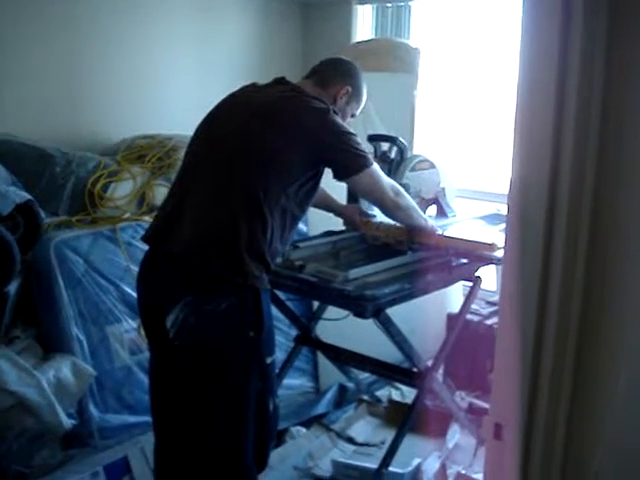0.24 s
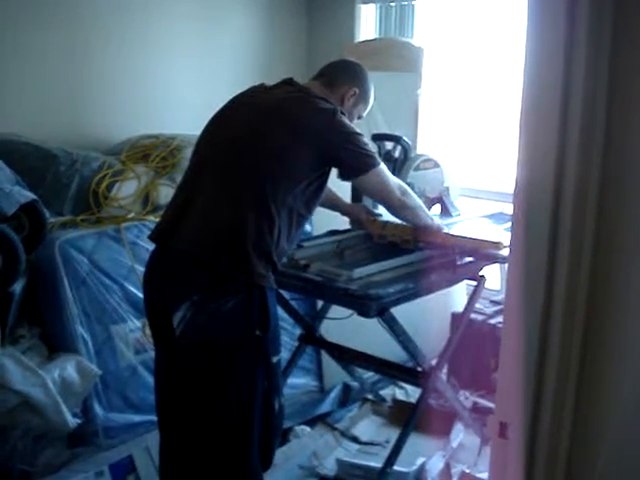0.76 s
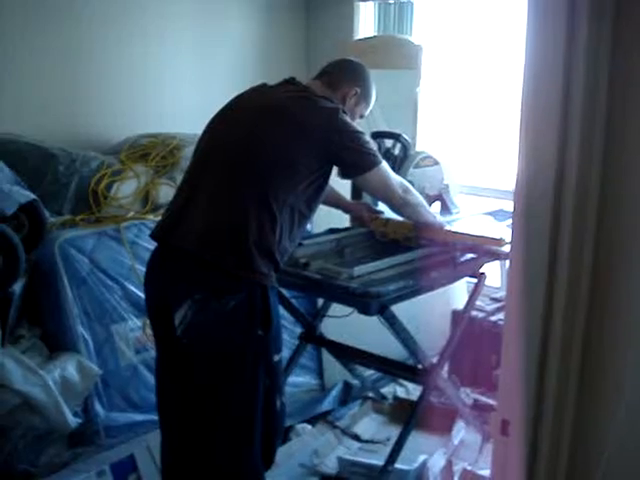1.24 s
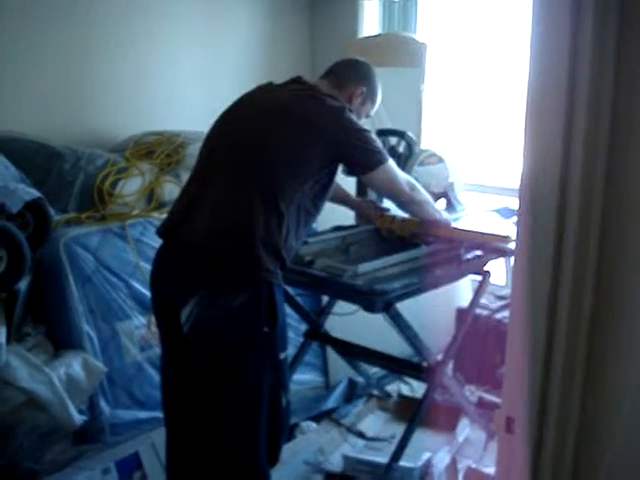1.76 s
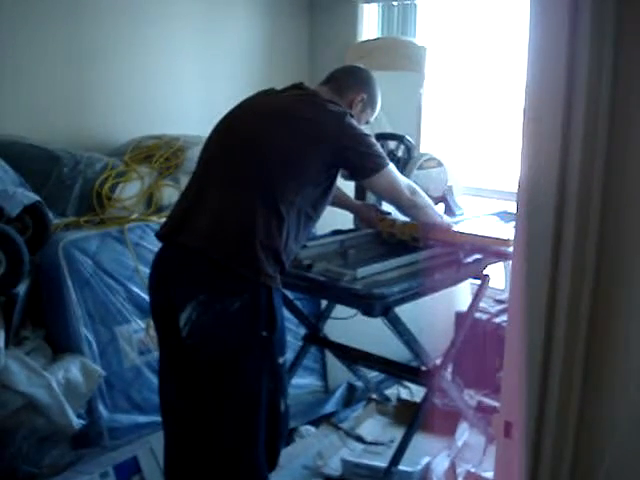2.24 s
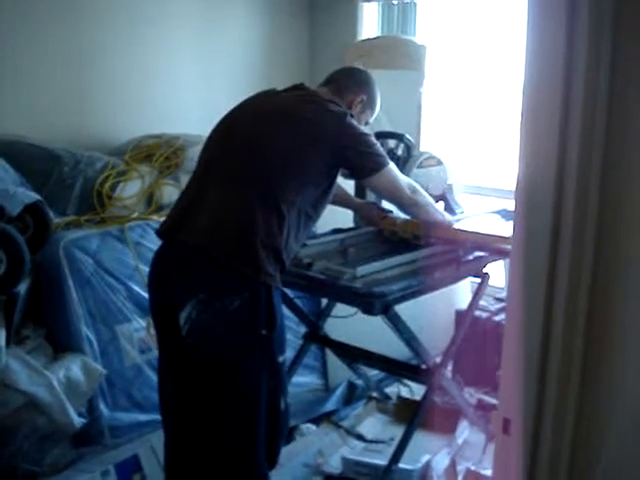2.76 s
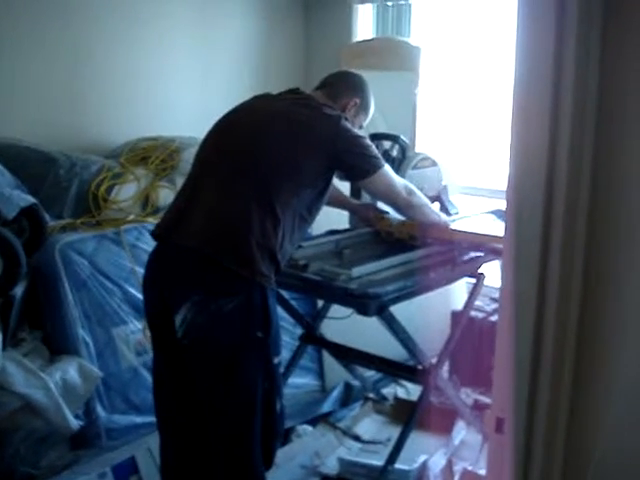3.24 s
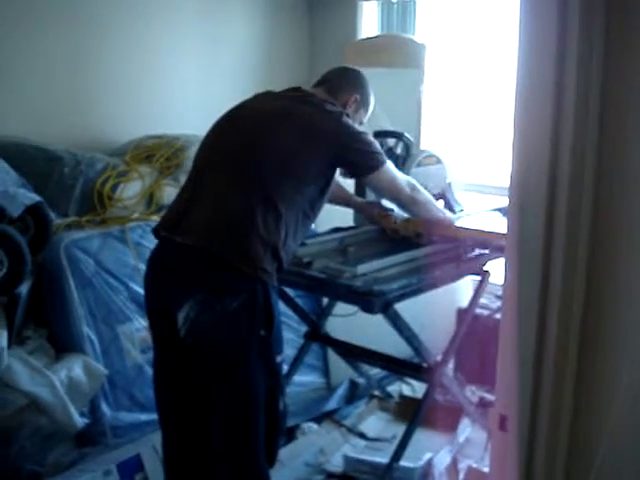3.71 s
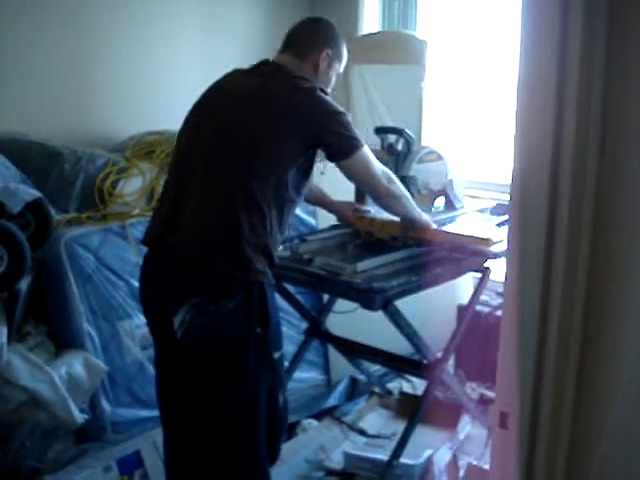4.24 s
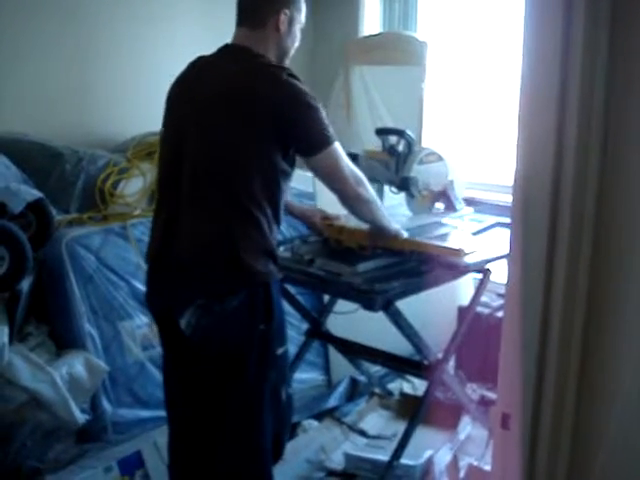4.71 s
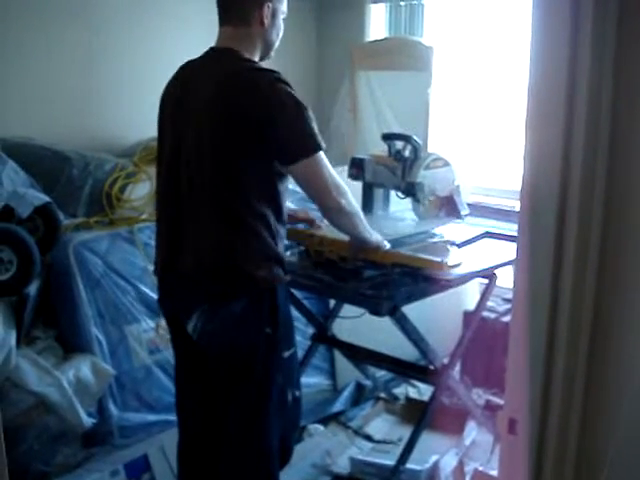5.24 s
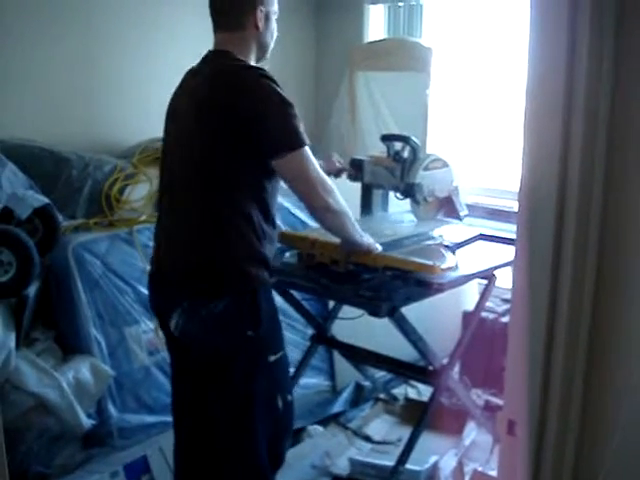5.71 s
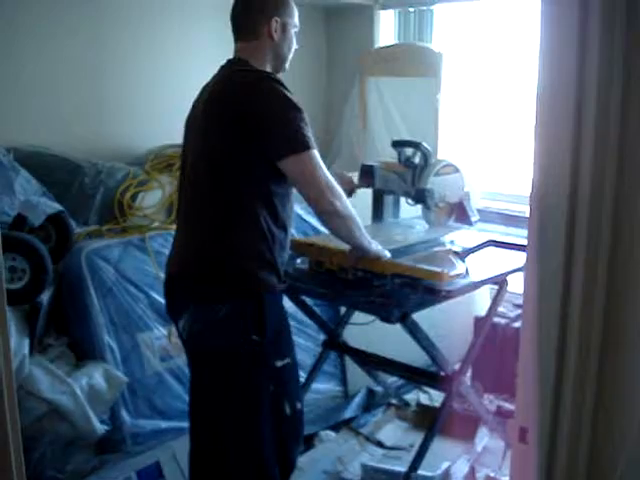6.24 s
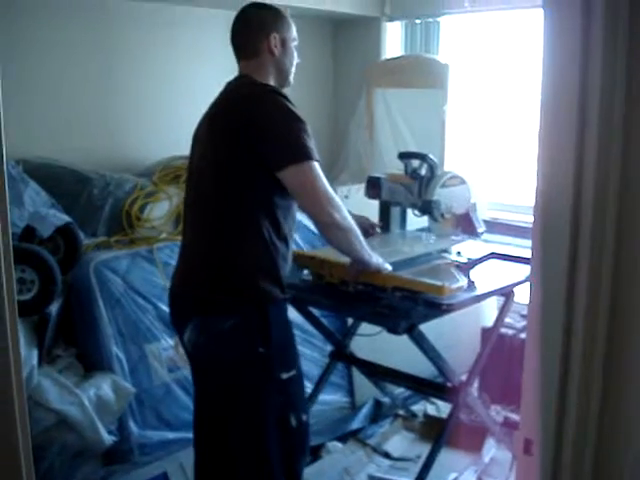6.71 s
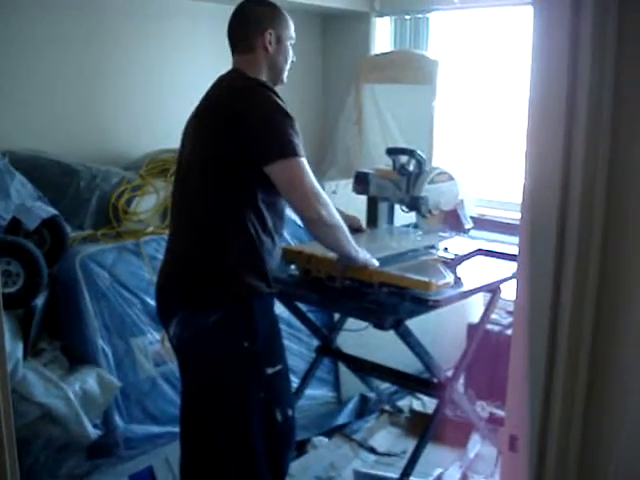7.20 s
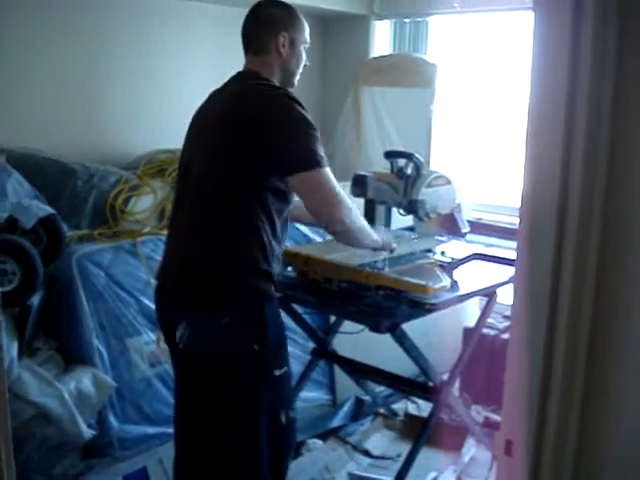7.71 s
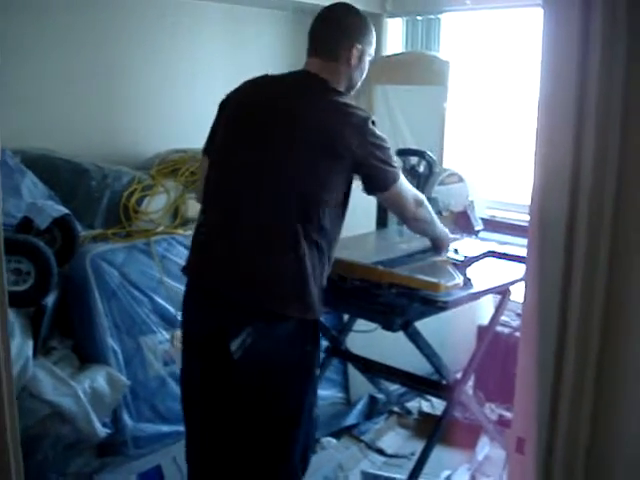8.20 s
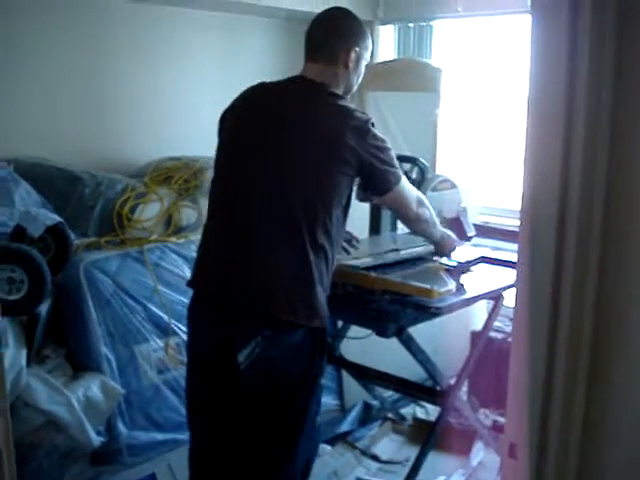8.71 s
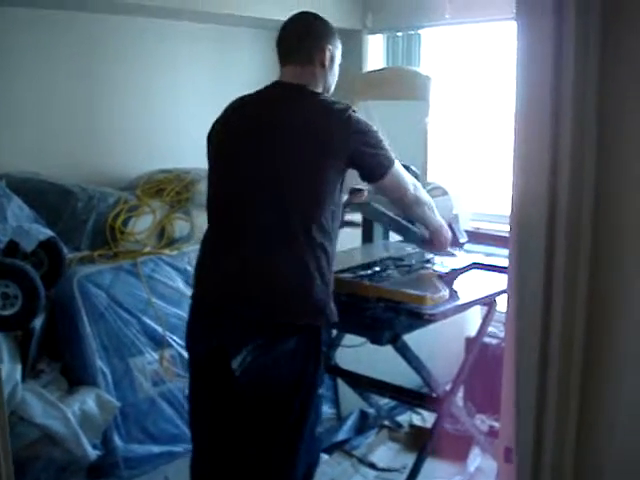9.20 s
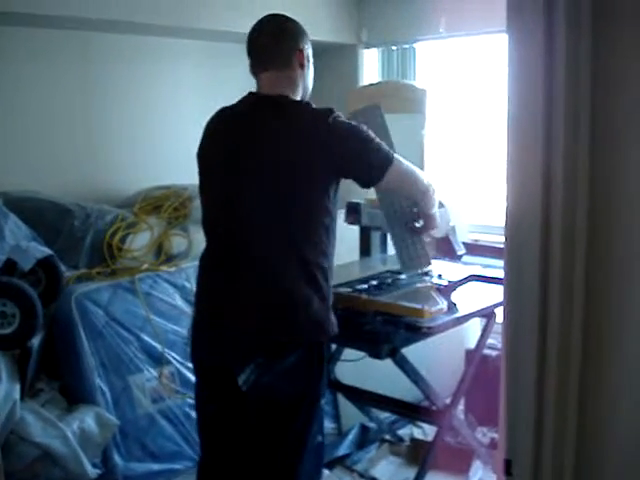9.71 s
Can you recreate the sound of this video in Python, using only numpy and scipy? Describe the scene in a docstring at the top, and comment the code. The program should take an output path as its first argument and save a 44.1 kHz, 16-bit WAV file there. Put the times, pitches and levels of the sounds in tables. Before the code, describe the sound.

A wet saw grinds through tile for about three seconds, buzzing under bright spitting hiss, with ringing from blade and tile. It then runs free with an airy fan roar and gritty rubbing before power is cut and the whine falls. A tile scrapes, water trickles, and a hard clustered knock comes near the end over faint low rumble. Mono pickup in a small, lightly reverberant room.

```python
"""A wet tile saw in a small room, at one microphone: it finishes a cut, runs free, is switched off and coasts.
In the cut the blade buzzes at its turning rate under a hiss of grinding grit, made of shaped noise.
The fan's roar and whine follow the motor's speed; bands of noise ring from blade and tile, and water trickles.
The tile is drawn back along the wet blade, then lifted off the table with a knock.
Behind it all lie the rumble of the stand, a draught at the microphone and soft low bumps."""
import sys
import numpy as np
from scipy import signal
from scipy.fft import rfft, irfft, next_fast_len
from scipy.io import wavfile
from scipy.ndimage import uniform_filter1d

SR = 44100
rng = np.random.default_rng(int(sys.argv[2]) if len(sys.argv) > 2 else 0)


def generate_wav(signal):
    """Clip the signal to [-1, 1] and save it as 16-bit WAV at the path in sys.argv[1]."""
    frames = np.transpose(np.atleast_2d(signal))
    scaled = np.clip(frames, -1, 1) * 32767
    pcm = np.round(scaled).astype(np.int16)
    wavfile.write(sys.argv[1], SR, pcm)


N = 438793
TIME = np.arange(N) / SR
EDGE_HZ = 10080  # upper edge of the microphone's band

# the motor labours under the tile and recovers: (time [s], motor speed [turns/s])
MOTOR_SPEED = [(0, 307.5), (.45, 305.4), (1, 310.4), (1.55, 314), (1.95, 311.8), (2.4, 311.5), (2.9, 313.8),
               (3.15, 318.2), (3.45, 320.6), (4.1, 313), (4.65, 310.6), (5.5, 317.9), (6.05, 321)]
# after the last point the power is off: friction and drag slow the rotor
OFF_S, FULL_SPEED_HZ = MOTOR_SPEED[-1]
FRICTION_HZ_PER_S, DRAG_PER_S = 21.3, .155


def speed_at(t):
    """Motor turns a second: driven at first, then coasting against steady friction and speed-dependent drag."""
    coasted = np.maximum(t - OFF_S, 0)
    offset = FRICTION_HZ_PER_S / DRAG_PER_S
    driven = follow(MOTOR_SPEED, t)[0]
    return (driven + offset) * np.exp(-DRAG_PER_S * coasted) - offset


def halvings_at(t):
    """How many times the speed has halved from full speed."""
    return np.log2(FULL_SPEED_HZ / speed_at(t))


# the blade breaks through the tile, and its buzz dies away
CUT_END_S, RELEASE_DB_PER_S = 3.32, 160


def bite_db(t):
    """Full while the blade is in the tile, falling fast when it breaks through."""
    return -RELEASE_DB_PER_S * np.clip(t - CUT_END_S, 0, 1)


GEAR = 6.1  # motor turns for one turn of the blade
# level of a harmonic of the blade's buzz, before its resonances: (frequency [Hz], level [dB])
BUZZ_SPECTRUM = [(300, -65.5), (405, -51), (600, -52), (720, -54.5), (950, -53.5), (1330, -57), (1700, -54),
                 (2150, -48.5), (3050, -52)]
# resonances of tile and blade that lift the buzz: (frequency [Hz], width [Hz], gain [dB])
BUZZ_RESONANCES = [(458, 5.6, 3), (496, 3.1, 8.5), (552.7, 5.2, 14), (606, 16, 9.5), (887, 17.5, 11.5),
                   (1022, 5, 13), (1109, 11, 14), (1222, 27, 10), (1390, 8, 8), (1562, 17, 11),
                   (1662, 12, 4.5), (1770, 6.2, 14), (2255, 19, 9), (2306, 14, 10.5), (2870, 21, 14)]


def blade_buzz(turns, shimmer=0.11, jitter=0.027, wander_db=2.5, count=60):
    """The rim strikes the tile once a turn; as load changes the speed, other harmonics meet resonances."""
    cutting = TIME < CUT_END_S + .5
    angle = (2 * np.pi * turns / GEAR)[cutting]
    rate = speed_at(TIME[cutting]) / GEAR
    hz = np.arange(EDGE_HZ)
    colour_db = read(BUZZ_SPECTRUM, hz) + peaks_db(BUZZ_RESONANCES, hz)
    out = np.zeros(N)
    for k in range(1, count + 1):
        size_db = np.interp(k * rate, hz, colour_db) + wander_db * drift(1.5)[cutting]
        size = gain_of(size_db) * (1 + shimmer * drift(9.28)[cutting])
        # higher harmonics stray further in phase
        phase = rng.uniform(0, 2 * np.pi) + jitter * np.sqrt(k) * drift(12)[cutting]
        out[cutting] += size * np.sin(k * angle + phase)
    return np.sqrt(2) * gain_of(bite_db(TIME)) * out


# level of the moving air at full speed, before its spectra:
# (time [s], fan's roar level [dB per Hz], broad rush level [dB per Hz])
AIR_LEVELS = [(0, -61, -79), (3.3, -61.5, -79), (3.52, -65, -69.5), (3.85, -57, -63.5), (4.8, -56.5, -63),
              (5.7, -56.5, -54), (6.4, -54.5, -54.5), (7.75, -54.5, -56), (8.35, -57, -56),
              (9.95, -56.5, -53.5)]
# both fall as the rotor slows: dB for each halving of speed
FAN_FALL_DB, RUSH_FALL_DB = 8.5, 7


def airflow_db(t):
    """Levels of the fan's roar and of the rush of air; both sink with the speed."""
    fan_db, rush_db = follow(AIR_LEVELS, t)
    halvings = halvings_at(t)
    return fan_db - FAN_FALL_DB * halvings, rush_db - RUSH_FALL_DB * halvings


# how hard the blade grinds on the tile, before colouring: (time [s], level [dB per Hz])
GRIND_LEVEL = [(0, -54.5), (3.4, -54), (3.62, -57), (3.9, -55), (5.1, -58), (5.55, -69.5), (6.1, -65),
               (6.62, -64), (6.88, -56.5), (7.14, -67), (7.73, -63), (8.0, -88), (8.75, -74.5), (9.95, -77)]
# spray follows the grinding; once the tile is clear, water gushes off the blade and settles
SPRAY_OVER_GRIND_DB = -22
GUSH_S, GUSH_RISE_DB_PER_S, GUSH_SETTLE_S = 7.85, 90, 0.59
GUSH_DB, GUSH_EXTRA_DB = -81.5, 9  # settled level [dB per Hz, before colouring], and the excess at its peak


def grinding_db(t):
    """Level of the grit between blade and tile."""
    return follow(GRIND_LEVEL, t)[0]


def water_db(t):
    """Level of the spray: thrown by the cut, then gushing off the free blade."""
    since = t - GUSH_S
    rise_db = GUSH_RISE_DB_PER_S * np.clip(since, -1, 0)
    settling_db = GUSH_EXTRA_DB * np.exp(-np.maximum(since, 0) / GUSH_SETTLE_S)
    return power_sum(GUSH_DB + rise_db + settling_db, grinding_db(t) + SPRAY_OVER_GRIND_DB)


# relative spectrum of grit on tile: (frequency [Hz], level [dB])
GRIT_SPECTRUM = [(200, -50.5), (290, -40), (360, -24.5), (520, -16), (800, -14.5), (1300, -16.5),
                 (1850, -11), (2250, -7.5), (3400, -7.5), (4500, 0), (5400, 0.44), (7000, -8.5),
                 (8300, -15), (10000, -26.5)]
# the fan's roar slides with speed: (multiple of the motor rate [ratio], level [dB])
FAN_SPECTRUM = [(4.0, -27.5), (7.0, -10.5), (9.0, -6.5), (12.0, -4), (15.0, -0.5), (17.0, 0), (19.0, -4),
                (21.0, -16.5), (27.0, -24), (40.0, -58)]
# relative spectrum of air through the motor: (frequency [Hz], level [dB])
AIR_SPECTRUM = [(130.0, -36), (200.0, -32), (300.0, -7.5), (500.0, -5), (900.0, -3.5), (1200.0, -1),
                (1450.0, -7.5), (2200.0, -7), (3200.0, -4.5), (4700.0, -8.5), (6000.0, -19),
                (10000.0, -50.5)]
# relative spectrum of spray in the guard: (frequency [Hz], level [dB])
SPRAY_SPECTRUM = [(2500.0, -21), (3800.0, -13.5), (4700.0, 10), (5700.0, -0.5), (6700.0, -0.5), (7800.0, 5),
                  (9200.0, 4), (10000.0, -2.5)]
# peaks and dips of housing, tray and room: (frequency [Hz], width [Hz], gain [dB])
BODY_RESONANCES = [(270, 11, -5), (277, 7.7, -5.5), (301.0, 19, -2), (342, 9.3, 4), (366, 19.4, -10.5),
                   (405, 14, 0.5), (476, 29, -3.5), (550, 8.8, -2), (663, 22, 3), (738, 12, -7),
                   (760, 8.9, -0.5), (870.5, 10.3, 9), (944, 10.0, 1.5), (1047, 12, -5), (1164, 7.5, -1.5),
                   (1172, 10.0, -9.5), (1254, 7.9, -1.5), (1360, 73, -3.5), (1564, 17, -2), (1690, 16, 7.5),
                   (1840, 13, -4.5), (1890, 20, -1), (2365, 6.2, 6), (2750, 32.0, 6.5), (2748, 13, -14),
                   (3024, 22.0, 3), (3320, 12, 4.5), (5750, 25, -6.5), (6820, 91, 4.5), (7650, 220, 2.5)]


def hiss_field(hz, t, patchy_db=1.3):
    """Density of grinding, fan, air and spray noise, all coloured by body and room."""
    fan_db, rush_db = airflow_db(t)
    level_db = power_sum(
        read(GRIT_SPECTRUM, hz) + grinding_db(t),
        read(FAN_SPECTRUM, hz / speed_at(t)) + fan_db,
        read(AIR_SPECTRUM, hz) + rush_db,
        read(SPRAY_SPECTRUM, hz) + water_db(t))
    # random patches, smoothed over frequency and then time
    patches = rng.standard_normal((len(hz), len(t)))
    patches = uniform_filter1d(patches, size=5, axis=0)
    patches = evened(uniform_filter1d(patches, size=16, axis=1))
    return level_db + peaks_db(BODY_RESONANCES, hz) + patchy_db * patches


def hiss(spatter=0.14, spatter_hz=6500):
    """The room ripples the hiss, and flung water makes its top end spatter."""
    x = room(noise(hiss_field), t60=0.25, wet_db=-8)
    highpass = signal.butter(2, spatter_hz, "high", fs=SR, output="sos")
    top = signal.sosfiltfilt(highpass, x)
    return x + spatter * top * evened(drift(30) + drift(150))


# level of the rotor's hum before its resonances: (time [s], level [dB])
HUM_LEVEL = [(0, -72), (3.6, -84.5), (4.5, -70.5), (5.2, -62), (6.1, -54.5), (7.7, -62.5), (9.95, -71.5)]
# resonances that the hum glides through: (frequency [Hz], width [Hz], gain [dB])
HUM_RESONANCES = [(318.2, 6.8, 19.5), (284, 6, 11.5), (213.5, 4, 12.5)]
# relative strength of the whine's partials: (multiple of the motor rate [ratio], level [dB])
WHINE_PARTIALS = [(2, -11), (3, -10), (5, -6.5), (7, -12.5), (8, -10), (9, -5), (10, -6.5), (11, 0.5),
                  (12, -1), (13, -7.5), (14, 1), (15, -1.5), (16, -1.5), (19, -5.5)]
# resonances that the whine glides through: (frequency [Hz], width [Hz], gain [dB])
WHINE_RESONANCES = [(1800, 41, 4), (2266, 59, 5.3), (2960, 400, 5.7)]
# the whine follows the fan's roar and stands out more for each halving of speed
WHINE_OVER_FAN_DB, WHINE_CLEARS_DB = 24.5, 2.5
WHINE_FLUTTER = .45  # rms swing of a partial, as a share of its size


def motor(turns, waver=0.11, rough=0.09):
    """The rotor's imbalance hums; its fan whines at higher multiples that swell gliding through resonances."""
    speed = speed_at(TIME)
    hum = np.sqrt(2) * np.sin(2 * np.pi * turns) * (1 + waver * drift(12))
    hum_db = follow(HUM_LEVEL, TIME)[0] + peaks_db(HUM_RESONANCES, speed)

    hz = np.arange(0., EDGE_HZ, 4)
    colour = gain_of(peaks_db(BODY_RESONANCES, hz) + peaks_db(WHINE_RESONANCES, hz))
    whine = np.zeros(N)
    for k, db in WHINE_PARTIALS:
        size = gain_of(db) * np.interp(k * speed, hz, colour) * (1 + WHINE_FLUTTER * drift(17))
        whine += size * np.sin(2 * np.pi * round(k) * turns + rough * drift(60))
    whine_db = airflow_db(TIME)[0] + WHINE_OVER_FAN_DB + WHINE_CLEARS_DB * halvings_at(TIME)
    return gain_of(hum_db) * hum + gain_of(whine_db) * evened(whine)


# bands of ringing noise from blade and tile, with a swell of the fan's whine near 1815 Hz
# and late trickling water near 4.8 kHz; level before the fades:
# (start time [s], stop time [s], frequency [Hz], half-width [Hz], level [dB])
NOISE_BANDS = [(0, 2.9, 4600, 20, -32), (0, 2.6, 5010, 40, -36), (0, 3.2, 5910, 25, -37),
               (.55, 0.62, 4525, 13, -25), (1.25, 1.88, 2280, 70, -38), (3.28, 3.47, 5850, 40, -29),
               (3.3, 3.43, 2360, 20, -37), (3.75, 4.8, 4745, 25, -31.5), (4.05, 4.9, 6485, 14, -41),
               (4.1, 6.2, 4475, 32, -34), (4.2, 4.7, 779, 9, -43.5), (6.55, 7.65, 4900, 150, -30.5),
               (6.68, 7.12, 5950, 550, -33), (6.72, 6.88, 1218, 9.1, -34.5), (8.62, 9.4, 4400, 330, -37),
               (8.85, 9.55, 7800, 300, -41), (9.05, 9.95, 960, 21, -42.5), (9.25, 9.42, 1815, 18, -37.5),
               (9.3, 9.95, 4790, 250, -40)]


def ringing_bands():
    """Noise through single resonance curves, each swelling and dying: blade, tile, a whine swell, late water."""
    out = np.zeros(N)
    for start, stop, hz, width, db in NOISE_BANDS:
        span = (TIME >= start) & (TIME < stop)
        n = 2 * next_fast_len(int(span.sum()))
        peak = 1 / (1 + ((np.fft.rfftfreq(n, 1 / SR) - hz) / width) ** 2)
        band = irfft(rfft(rng.standard_normal(n)) * peak)[:span.sum()]
        fades = signal.windows.tukey(len(band), .4)
        out[span] += gain_of(db) * evened(band) * fades
    return out


# the tile knocks on the table: (time [s], strength of the blow [dB])
TILE_KNOCKS = [(8.27, -38), (9.533, -22.5), (9.575, -27.5), (9.61, -34)]
# the modes of the table, relative to each other: (frequency [Hz], level [dB], decay by 60 dB [s])
TABLE_MODES = [(150, -26, 0.13), (322, -10, 0.19), (380, -2, 0.18), (480, 0, 0.2), (559, 1.5, 0.34),
               (686, -4.5, 0.1), (800, -2, 0.13), (970, -12, .1), (1330, -2, 0.11), (1750, -15, .08),
               (2390, -4, .08)]


def knocks(clatter_db=-3):
    """Each blow rings the modes of the table, with a short dull clatter of tile."""
    t = TIME[:SR // 2]
    ring = np.zeros(len(t))
    for hz, db, t60 in TABLE_MODES:
        ring += gain_of(db - 60 * t / t60) * np.sin(2 * np.pi * (hz * t + rng.random()))
    band = signal.butter(2, [350, 1800], "band", fs=SR, output="sos")
    clatter = evened(signal.sosfilt(band, rng.standard_normal(len(t))))
    knock = .5 * ring + gain_of(clatter_db) * clatter * np.exp(-t / 0.033)
    blows = np.zeros(N)
    for s, db in TILE_KNOCKS:
        blows[round(s * SR)] = gain_of(db)
    return room(signal.oaconvolve(blows, knock)[:N], t60=0.3, wet_db=-6)


# levels before colouring [dB per Hz]: while cutting and while running free
STAND_CUT_DB, STAND_FREE_DB = -87.5, -95.5
# the free stand's rumble swells towards the end
SHAKE_DB, SHAKE_FROM_S, SHAKE_RISE_S = 18, 4.46, 3.9


def stand_rumble(rub_db=-35):
    """The stand rumbles under the cut and the rubbing tile, and shakes more towards the end."""
    def level_db(t):
        shake_db = SHAKE_DB * np.clip((t - SHAKE_FROM_S) / SHAKE_RISE_S, 0, 1)
        return power_sum(STAND_CUT_DB + bite_db(t), grinding_db(t) + rub_db, STAND_FREE_DB + shake_db)

    spectrum = [(50, -14), (90, -1), (190, -4.5), (300, 6.5), (900, -22), (3000, -67)]
    return noise(lambda hz, t: read(spectrum, hz) + level_db(t))


# levels before colouring [dB per Hz]: while cutting and while running free
DRAUGHT_CUT_DB, DRAUGHT_FREE_DB = -82, -92.5


def draught(rub_db=-29.5):
    """Air at the microphone: very low noise, stronger in the cut and with the grinding."""
    def level_db(t):
        return power_sum(DRAUGHT_CUT_DB + bite_db(t), grinding_db(t) + rub_db, DRAUGHT_FREE_DB)

    spectrum = [(10, 1), (40, 1.5), (90, -8.0), (400, -74)]
    return noise(lambda hz, t: read(spectrum, hz) + level_db(t))


# soft low bumps: (time [s], scale of the pulse [dB], time constant [s])
LOW_BUMPS = [(6.73, -44, .008), (7.669, -29, .0035), (8.055, -36, .0015), (8.275, -37, .002),
             (9.545, -30, .001)]


def bumps():
    """Each bump is one smooth pulse that swings up, then below zero, and dies away."""
    out = np.zeros(N)
    for s, db, length in LOW_BUMPS:
        u = np.maximum(TIME - s, 0) / length
        out += gain_of(db) * u * (2 - u) * np.exp(-u)
    return out


def room(x, t60, wet_db):
    """Direct sound and a short diffuse tail, together of unit energy."""
    t = TIME[:SR // 2]
    response = rng.standard_normal(len(t)) * gain_of(-60 * t / t60) * (t > .003)
    response *= gain_of(wet_db) / np.linalg.norm(response)
    response[0] = 1
    return signal.oaconvolve(x, response / np.linalg.norm(response))[:N]


def noise(field_db):
    """Noise whose density follows field_db(Hz, s), in dB per Hz."""
    hz, t, z = signal.stft(rng.standard_normal(N), SR, nperseg=2048, noverlap=1536)
    z = z * np.sqrt(SR / 2) * gain_of(field_db(hz[:, None], t))
    return signal.istft(z, SR, nperseg=2048, noverlap=1536)[1][:N]


def drift(hz):
    """Smooth chance of rms 1 that changes about hz times a second."""
    knots = rng.standard_normal(2048)
    return evened(np.interp(TIME * hz, np.arange(len(knots)), knots))


def peaks_db(peaks, hz):
    """The gain that a set of resonances gives at hz."""
    return sum(db * np.exp(-.5 * ((hz - f) / width) ** 2) for f, width, db in peaks)


def power_sum(*levels_db):
    """The level of unrelated sounds together."""
    return 10 * np.log10(sum(gain_of(db) ** 2 for db in levels_db))


def read(points, hz):
    """A spectrum in dB on a log axis, -90 dB below its first point."""
    f, db = np.transpose(points)
    return np.interp(np.log(hz + 1e-3), np.log(f), db, left=-90)


def follow(rows, t):
    """Each column of a curve at the times t."""
    s, *columns = np.transpose(rows)
    return [np.interp(t, s, c) for c in columns]


def evened(x):
    """Scales to rms 1."""
    return x / np.sqrt(np.mean(x ** 2) + 1e-20)


def gain_of(db):
    """Decibels to amplitude."""
    return 10 ** (np.asarray(db) / 20)


def scene():
    """The saw in its room, heard by one microphone and written to both channels."""
    turns = np.cumsum(speed_at(TIME)) / SR
    saw = blade_buzz(turns) + hiss() + motor(turns)
    details = ringing_bands() + knocks()
    background = stand_rumble() + draught() + bumps()
    mono = saw + details + background
    return np.array([mono, mono])


def record(dry):
    """The microphone's band limit: a steep low-pass at EDGE_HZ."""
    lowpass = signal.firwin(801, EDGE_HZ, window=("kaiser", 8), fs=SR)
    return signal.oaconvolve(dry, lowpass[None], "same")


dry = scene()
out = record(dry)
generate_wav(out)
```